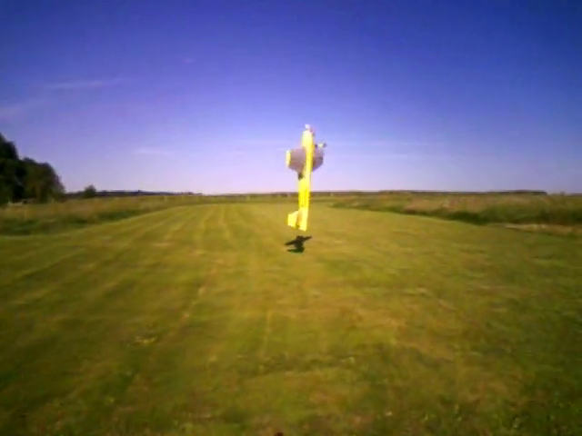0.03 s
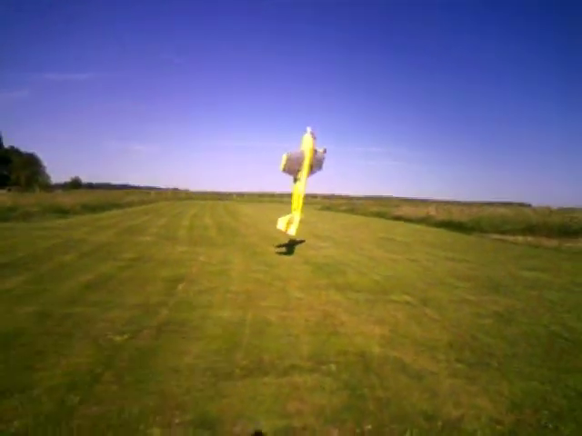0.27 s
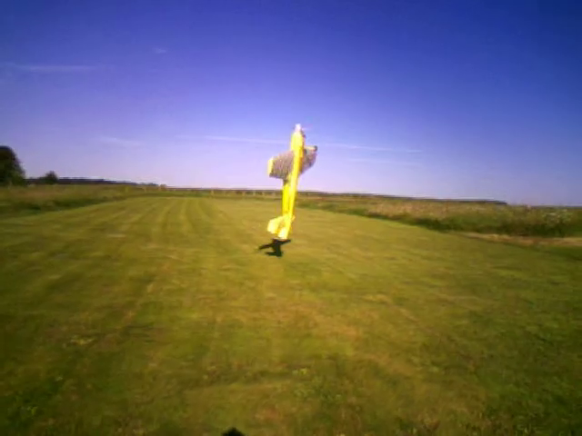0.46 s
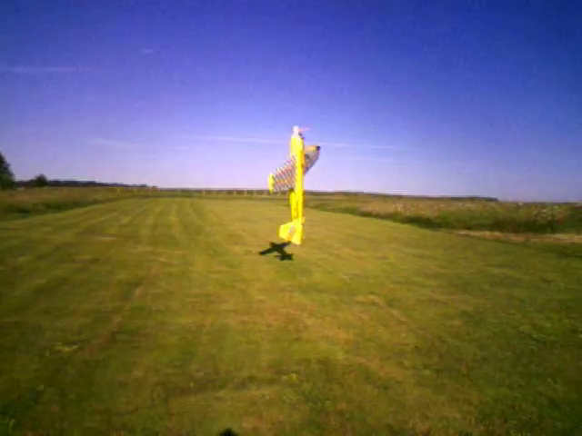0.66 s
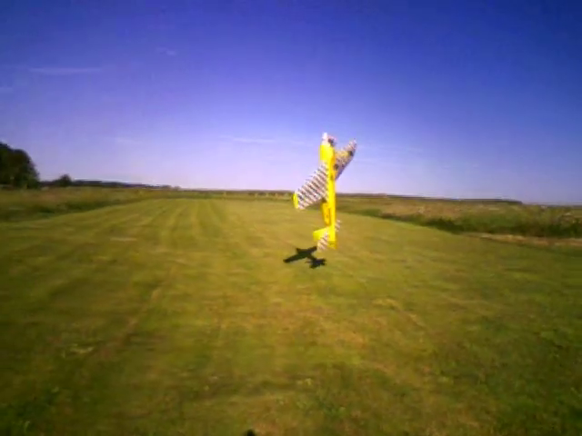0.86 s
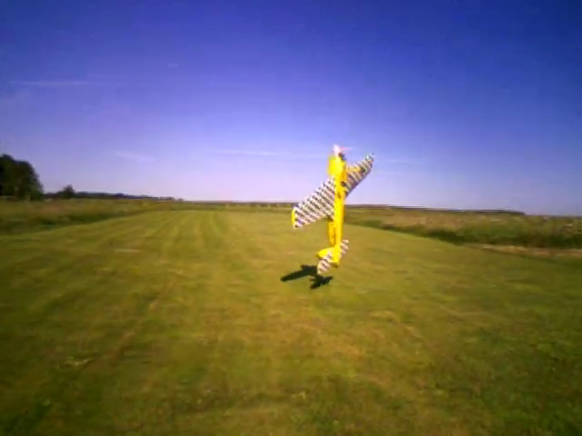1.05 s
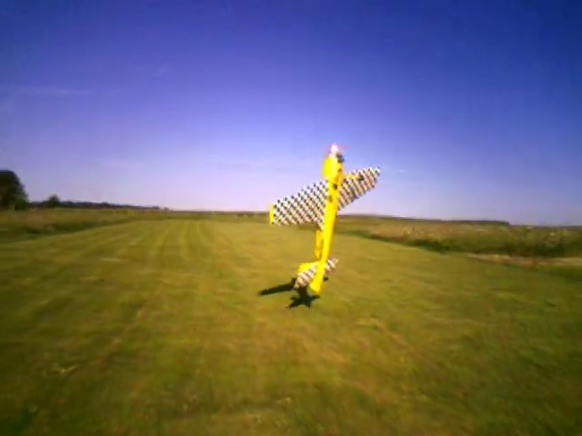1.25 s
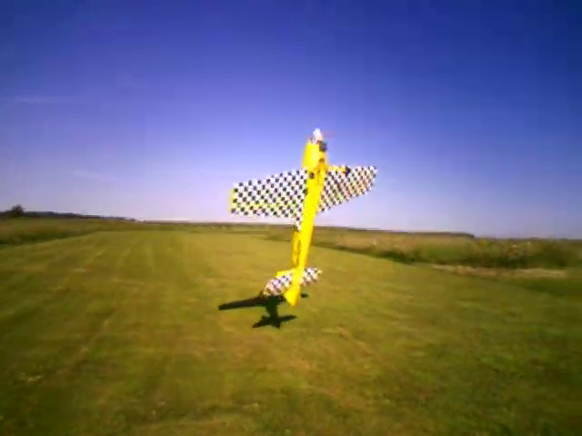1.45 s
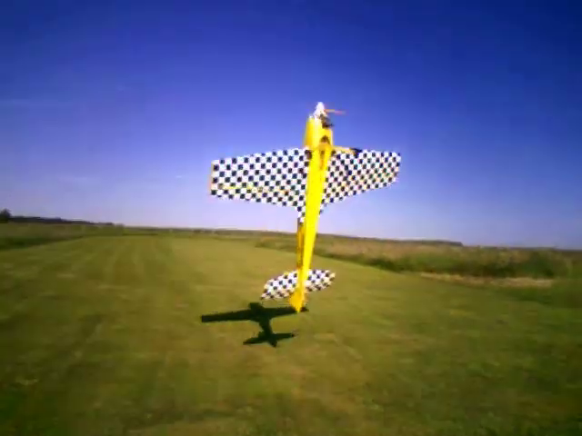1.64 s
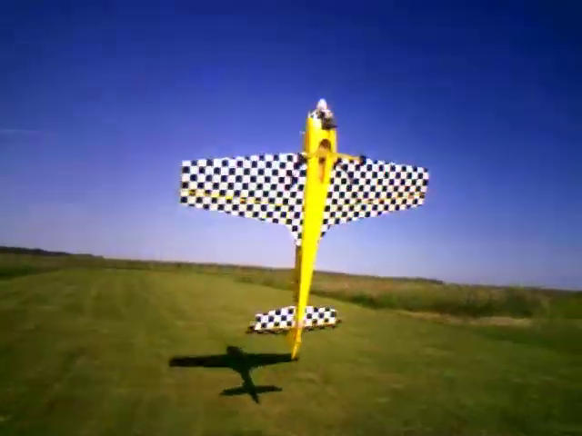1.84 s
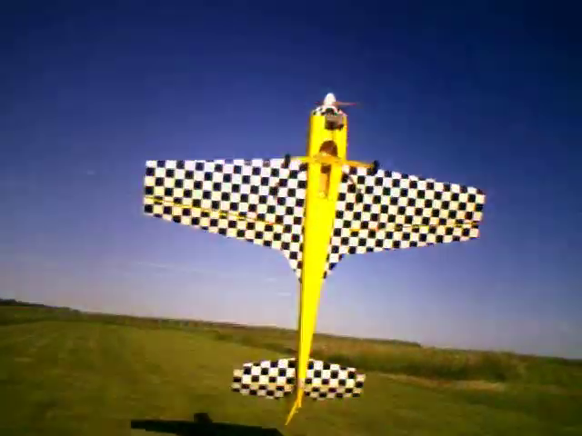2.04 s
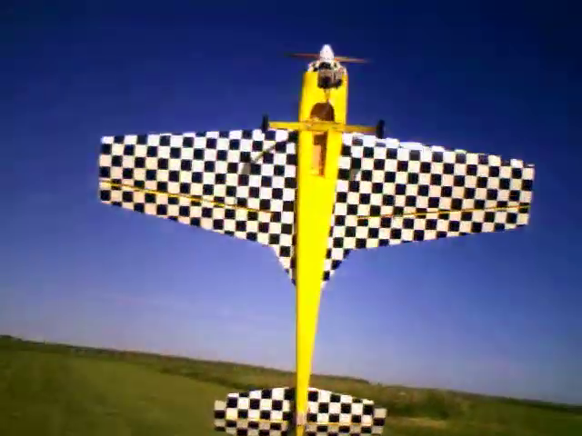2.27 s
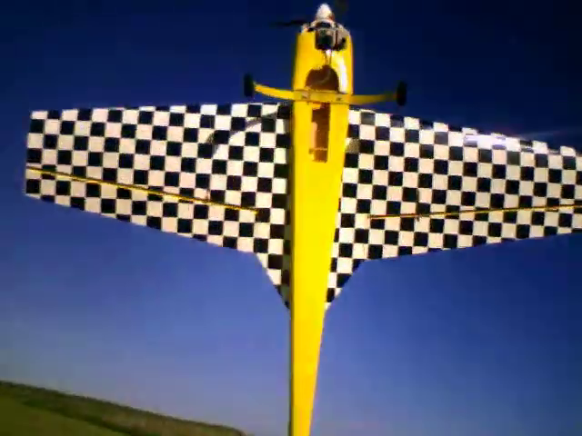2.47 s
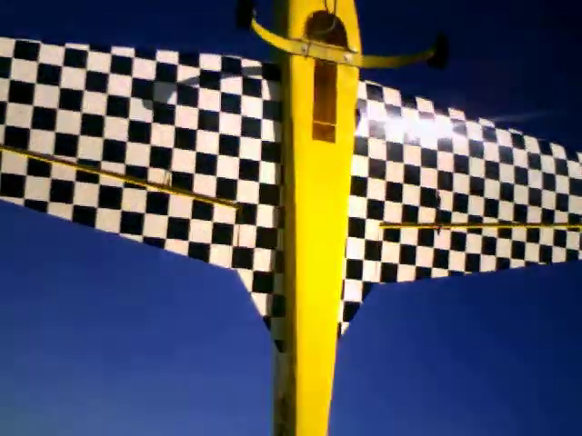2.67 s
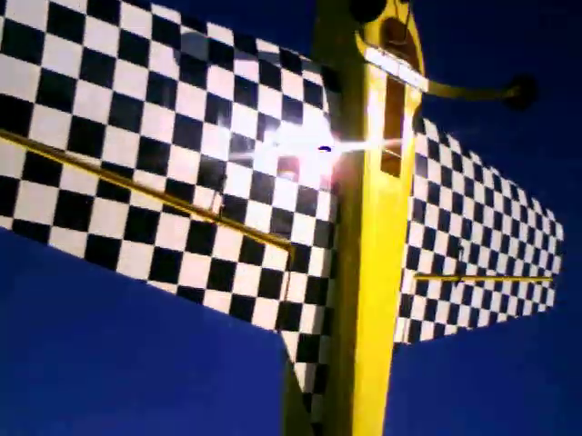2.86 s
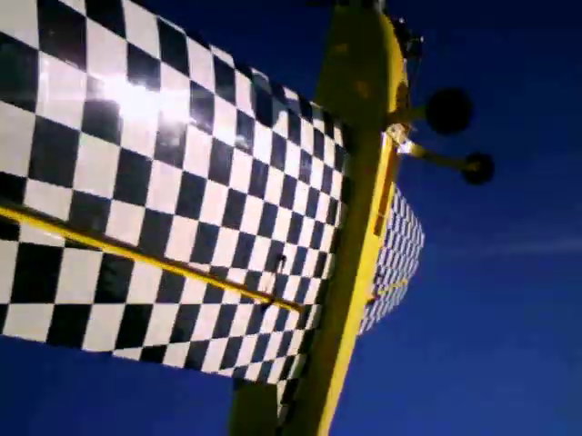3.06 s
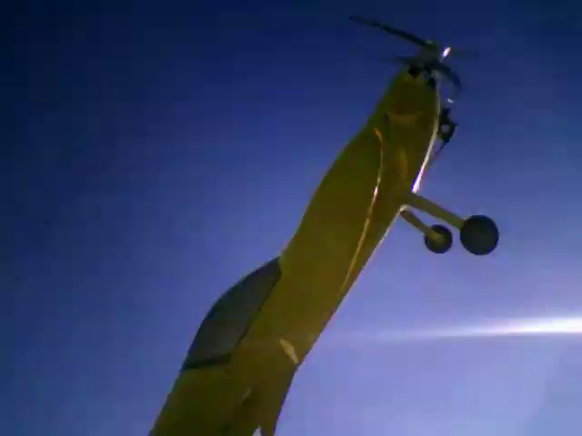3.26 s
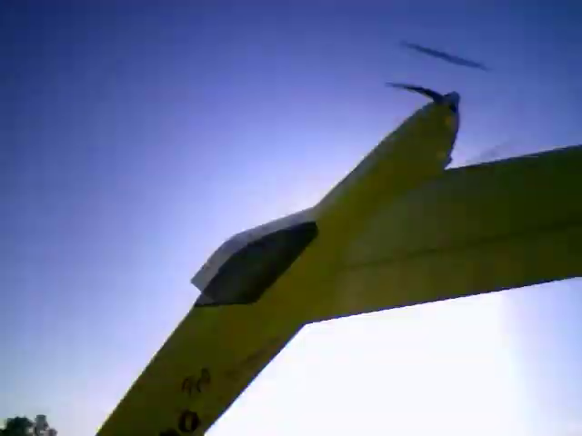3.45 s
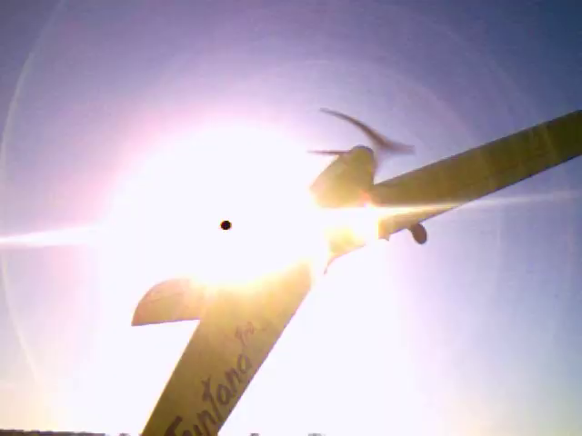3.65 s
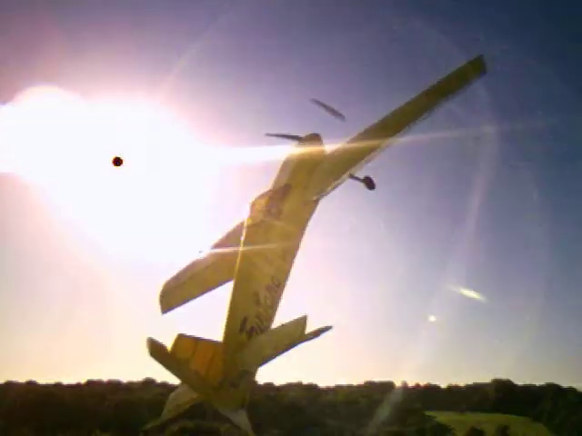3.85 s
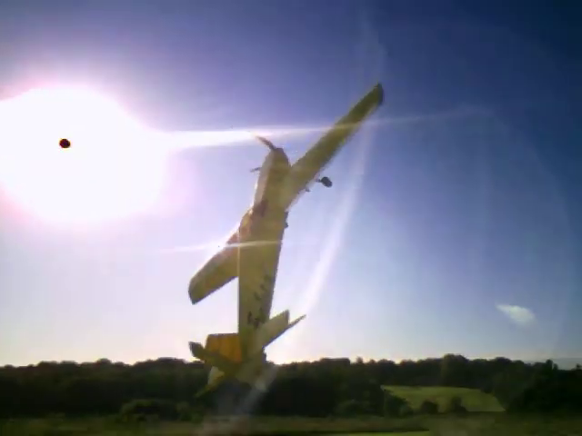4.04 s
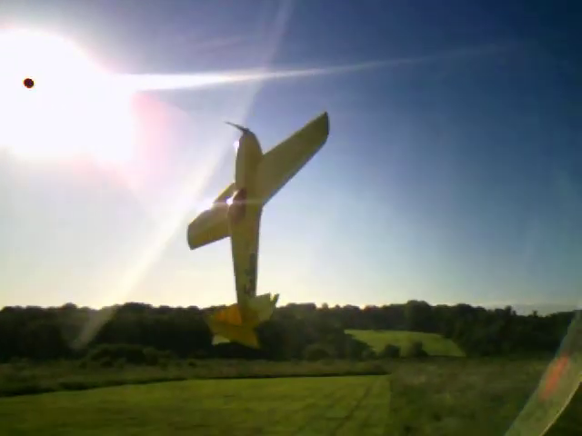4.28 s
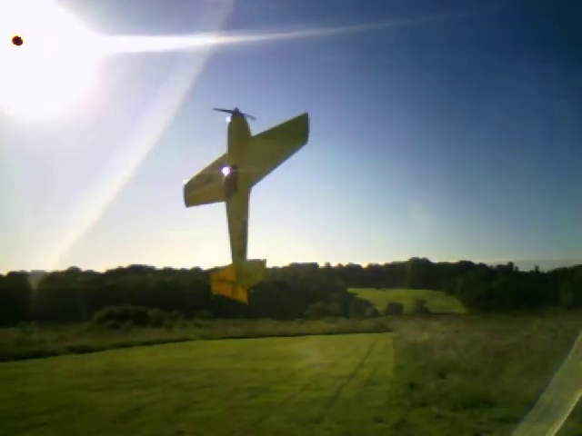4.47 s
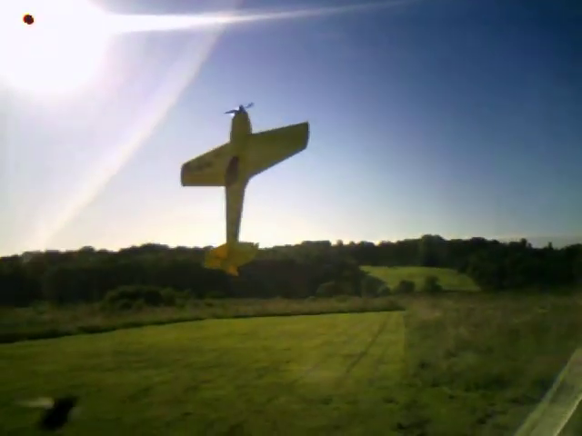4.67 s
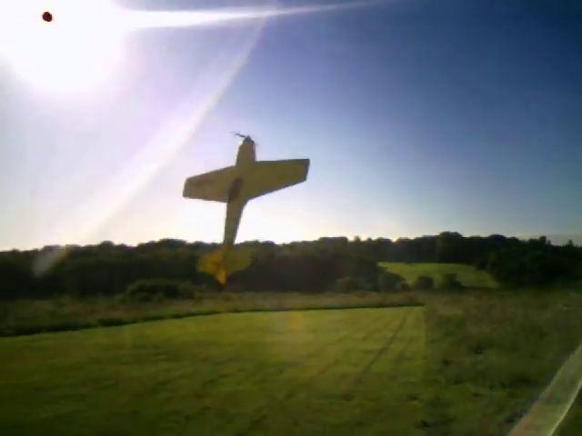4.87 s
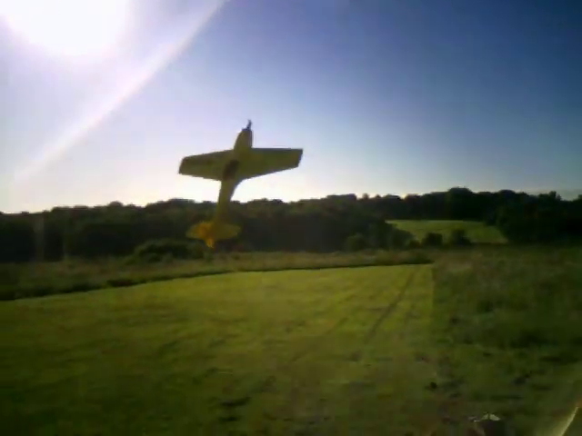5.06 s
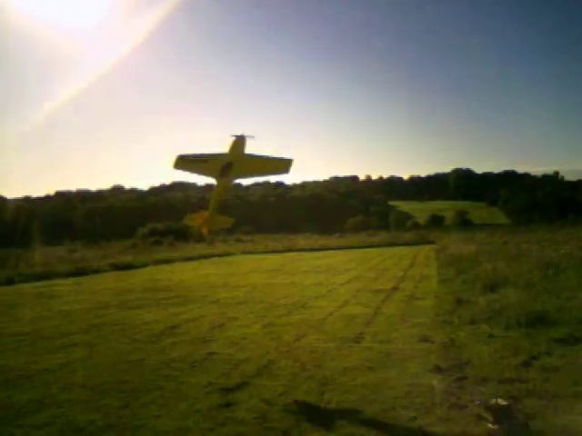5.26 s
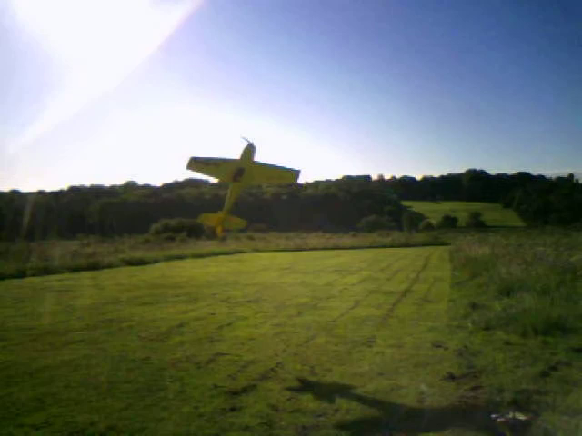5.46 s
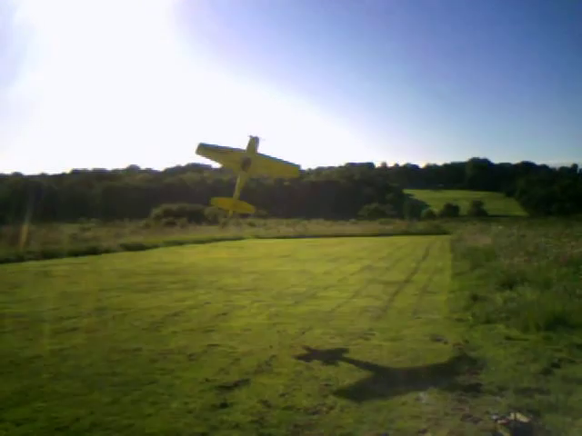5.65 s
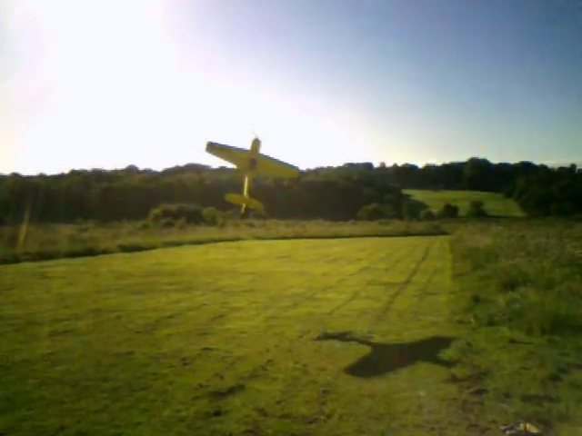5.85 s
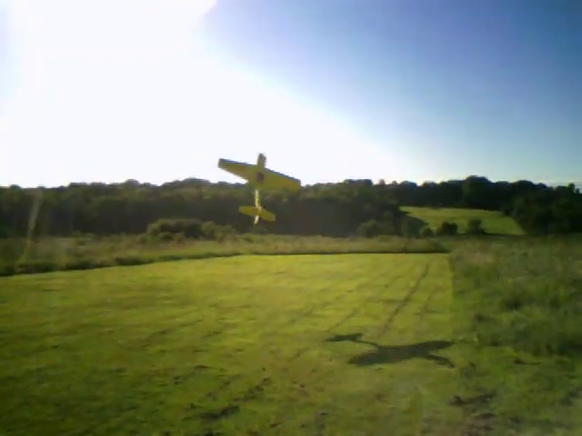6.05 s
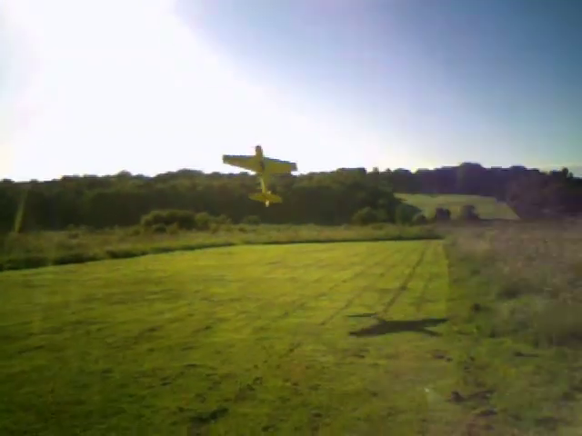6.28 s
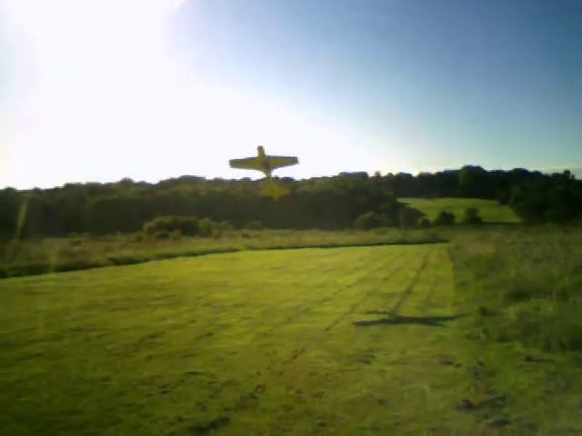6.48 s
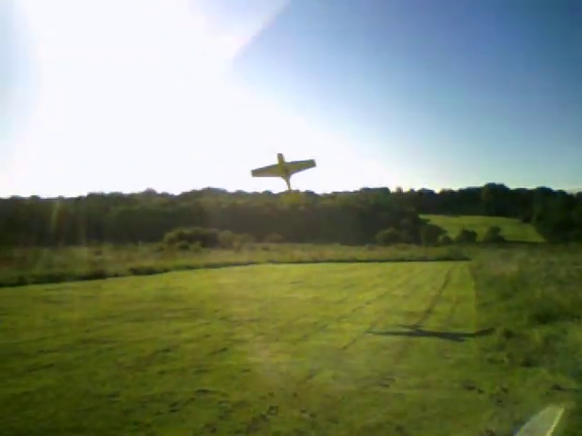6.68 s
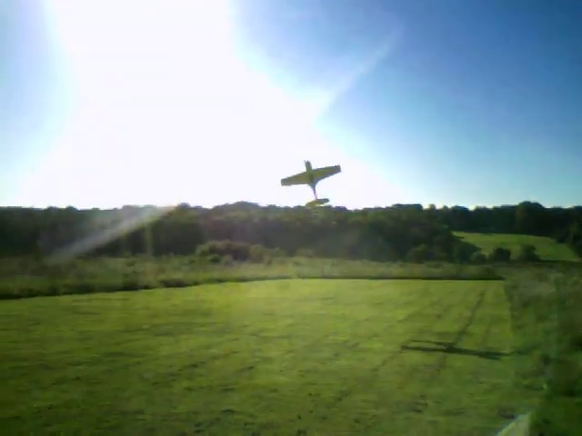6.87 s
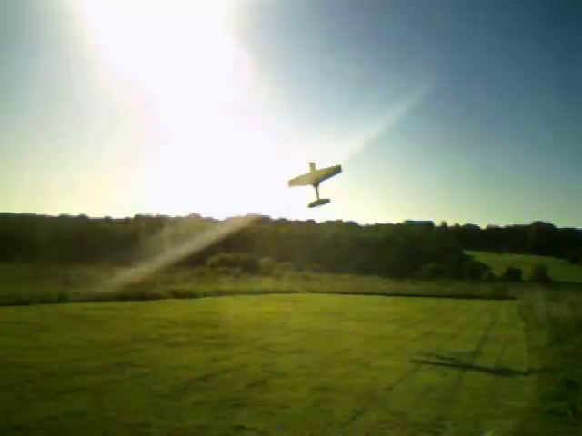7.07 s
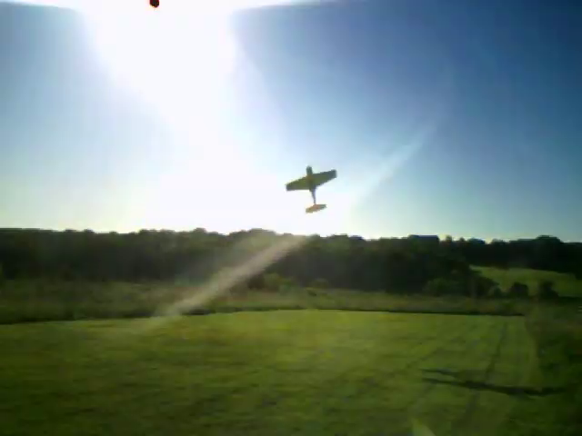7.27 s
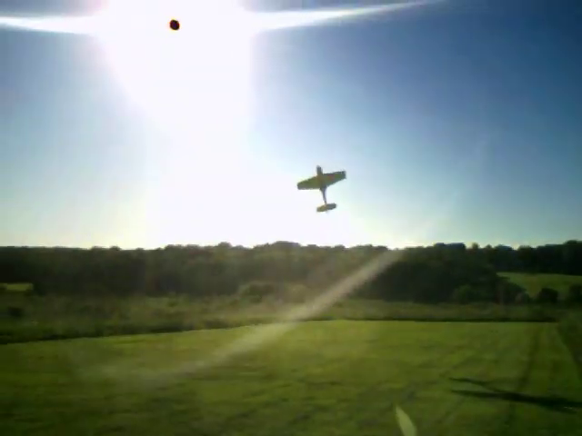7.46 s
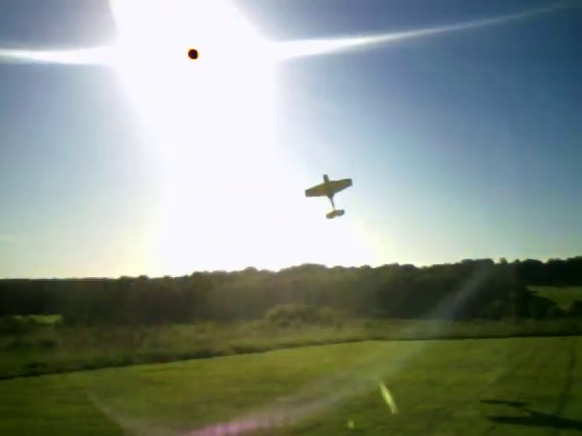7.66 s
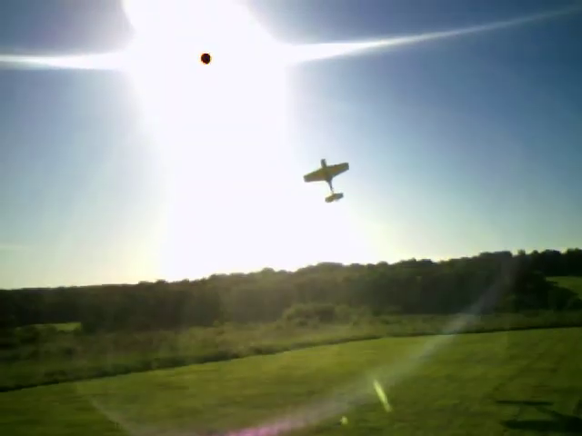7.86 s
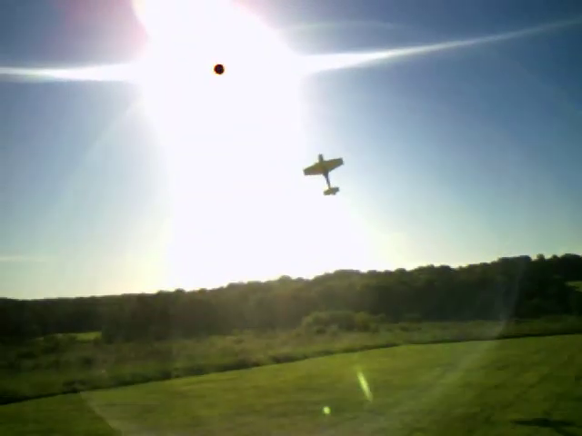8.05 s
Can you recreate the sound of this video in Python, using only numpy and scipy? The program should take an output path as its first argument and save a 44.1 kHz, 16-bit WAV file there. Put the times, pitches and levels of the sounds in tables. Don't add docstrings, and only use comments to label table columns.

```python
import sys
import numpy as np
from scipy import signal
from scipy.fft import rfft, irfft, next_fast_len
from scipy.io import wavfile
from scipy.ndimage import uniform_filter1d

SR = 44100
rng = np.random.default_rng(int(sys.argv[2]) if len(sys.argv) > 2 else 0)


def generate_wav(sig):
    pcm = np.round(np.clip(np.atleast_2d(sig).T, -1, 1) * 32767).astype(np.int16)
    wavfile.write(sys.argv[1], SR, pcm)


def invert_db(level):
    return 10 ** (np.asarray(level, dtype=float) / 20)


N = 358091


def level(x, db):
    return x * invert_db(db) / np.sqrt(np.mean(x ** 2))


def curves(table):
    s, *columns = np.transpose(table)
    return [np.interp(np.arange(N) / SR, s, c) for c in columns]


def walk(rate_hz):
    place = np.arange(N) * (rate_hz / SR)
    k = place.astype(int)
    part = place - k
    knots = 1.15 * rng.standard_normal(k[-1] + 2)
    smooth_step = part * part * (3 - 2 * part)
    return knots[k] + np.diff(knots)[k] * smooth_step


def coloured(points):
    hz, db = np.transpose(points)
    size = next_fast_len(N)
    log_hz = np.log(np.arange(size // 2 + 1) * SR / size + 1)
    gain = invert_db(np.interp(log_hz, np.log(hz), db))
    return level(irfft(rfft(rng.standard_normal(size)) * gain, size)[:N], 0)


# t/s, f/Hz
THROTTLE = [(0.0, 94.55), (0.471, 100.3), (0.496, 83.1), (1.154, 120.3), (1.703, 72.62), (2.012, 99.5),
            (2.331, 81.63), (3.396, 104.3), (3.424, 122.8), (3.826, 85.17), (4.406, 95.8), (4.623, 57.93),
            (5.361, 110.9), (5.787, 83.78), (6.198, 97.55), (6.9, 97.05), (7.393, 104), (8.12, 95.7)]


def shaft_hz():
    inertia_s = .119
    hz = curves(THROTTLE)[0]
    for _ in range(3):
        hz = uniform_filter1d(hz, size=int(2 * inertia_s * SR), mode="nearest")
    return hz


# t/s, disturbed inflow (1 = usual), phase spread/rad from wing echoes
INFLOW = [(0, .3, .7), (1.3, .55, .6), (2.3, .6, .9), (3.5, .8, .9), (4.3, .9, .6), (4.45, 3.2, .5),
          (4.85, 3.0, .5), (5.05, 1.1, .5), (5.45, .9, .5), (5.55, .9, 1.3), (5.72, .8, 1.3), (5.8, .7, .5),
          (6.05, .7, .5), (6.2, .35, 1.2), (8.12, .3, 1.2)]
# t/s, lag/ms
GRASS_LAG = [(-0.02, 6.64), (0.67, 6.5), (0.76, 7.3), (1.18, 6.02), (1.66, 8.25), (1.83, 7.86),
             (2.38, 9.68), (2.97, 9.6), (3.41, 7.34), (3.55, 7.55), (4.43, 4.92), (5.06, 3.37),
             (5.49, 3.764), (5.73, 2.36), (6.62, 1.85), (6.71, 0.68), (7.42, 0.56), (8.1, 0.59)]


def air_around(hz):
    return curves(INFLOW) + [hz] + curves(GRASS_LAG)


# t/s, order, length/s,
# level/dB
ROLL_LOBES = [(0.277, 15, 0.46, 10.5), (0.402, 3, 0.9, -5.5), (0.485, 2, 0.58, -5.5), (0.92, 4, 0.7, -4.5),
              (1.565, 6, 0.34, -7.5), (1.633, 4, 0.61, -5), (1.928, 3, 0.37, -3), (1.994, 2, 0.21, 10),
              (1.994, 5, 0.78, -8.5), (2.468, 4, 0.27, -18), (2.925, 13, 0.22, 12.0), (3.116, 6, 0.2, -11),
              (3.372, 2, 0.52, 11), (3.7, 3, 0.32, -7), (3.83, 7, 0.13, 10), (4.151, 4, 0.7, -13.5),
              (4.271, 8, 0.11, -9), (4.711, 6, 0.24, -9), (4.868, 4, 0.12, -15.5), (5.31, 8, 0.93, -6),
              (5.343, 5, 0.24, -16), (5.439, 2, 0.2, 8), (5.882, 3, 1, -4), (6.575, 10, 0.46, 7),
              (6.787, 7, 0.45, -15), (6.974, 6, 0.6, -19.5), (7.26, 9, 0.33, 9), (7.584, 5, 0.7, -7),
              (7.692, 14, 0.3, 10), (7.805, 7, 0.2, 11.5),
              (.3, 1, 0.44, -6), (1.15, 1, 0.44, 4), (1.479, 13, .3, 5.5), (2.073, 8, 0.13, 8),
               (2.122, 10, .2, -9.5), (2.592, 2, .45, 5.5), (2.752, 4, 0.26, 6), (2.786, 8, .3, 5.5),
               (2.871, 7, 0.49, 6), (2.908, 13, .3, -3), (2.987, 12, 0.22, 8), (3.072, 6, 0.73, 4),
               (3.15, 3, 0.18, 6), (4.701, 7, 0.28, -4), (4.705, 12, 0.77, -7.5), (4.749, 3, 0.29, 5),
               (4.83, 5, .3, -7), (5.05, 2, .2, -4), (5.27, 4, .2, -10), (5.63, 6, .45, -4),
               (5.833, 11, .5, 6), (5.9, 2, .4, -8), (6.513, 3, 0.22, 8), (6.587, 10, .2, 2.5),
               (7.1, 12, 0.56, 3), (7.141, 3, 0.25, 4.5), (7.22, 13, .7, 5), (7.298, 8, 0.16, 7),
               (7.58, 4, 0.25, 6.5), (7.62, 11, 0.63, 4)]


def lobes_db(order):
    t = np.arange(N) / SR
    return sum(db * np.exp(-2 * ((t - s) / length) ** 2)
               for s, k, length, db in ROLL_LOBES if round(k) == order)


def tone(turns, air, order, db, flutter_db):
    echo_share, grass_hz = 0.54, 415
    rough, spread, hz, lag_ms = air
    smear = (.12 + .04 * order) * walk(30)
    phase = 2 * np.pi * order * turns + spread * walk(1.5) + rough * smear
    echo = echo_share / np.hypot(1, order * hz / grass_hz)
    late = 2 * np.pi * order * hz * lag_ms / 1000
    loudness = np.sqrt(2) * invert_db(db + lobes_db(order) + flutter_db * walk(18))
    return -loudness * (np.cos(phase) + echo * np.cos(phase - late))


# order, level/dB
BLADE_ORDERS = [(2, -14.5), (4, -7), (6, -10), (8, -9.5)]
# order, level/dB
FRAME_ORDERS = [(1, -20.5), (3, -9.5), (5, -8), (7, -12.5)]


def low_tones(turns, air, tones_db):
    blades = sum(tone(turns, air, round(k), db, flutter_db=1.5) for k, db in BLADE_ORDERS)
    frame = sum(tone(turns, air, round(k), db, flutter_db=1.4) for k, db in FRAME_ORDERS)
    return invert_db(tones_db) * (blades + frame)


# order, level/dB
MOTOR_ORDERS = [(9, -13.5), (10, -13.5), (11, -16), (12, -15.5), (13, -17), (14, -17), (15, -19)]
# order, level/dB
UPPER_ORDERS = [(16, -8), (17, -11), (18, -11.5), (19, -13), (20, -17.5), (21, -21), (22, -12.5)]


def whine(turns, air, tones_db, upper_db):
    swell_db = 3.
    strong = sum(tone(turns, air, round(k), db, flutter_db=2.24) for k, db in MOTOR_ORDERS)
    weak = sum(tone(turns, air, round(k), db + swell_db * walk(4), flutter_db=2.5) for k, db in UPPER_ORDERS)
    return invert_db(tones_db) * strong + invert_db(upper_db) * level(weak, -8.5)


# f/Hz, level/dB per Hz
TIP_RUSH = [(40, -21.5), (150, -18), (300, -4.5), (1000, 1), (2000, -4), (3000, -15.5), (4500, -16.5),
            (8000, -48)]
# f/Hz, level/dB per Hz
WAKE_RASP = [(300, -26), (1000, -3), (2000, -3), (3500, -8), (5000, -5), (9000, -25.5)]


def rush(turns, rush_db, rasp_db):
    swirl = invert_db(1.8 * walk(9) + 0.69 * walk(40)) * level(coloured(TIP_RUSH), 2.22)
    shifted = turns + .15
    scatter_db = 1.5
    strength = invert_db(scatter_db * rng.standard_normal(N // 100))[shifted.astype(int)]
    gate = strength * np.exp(-(shifted % 1) / 0.2)
    rasp = level(gate * coloured(WAKE_RASP), -4.0)
    return invert_db(rush_db) * (swirl + invert_db(rasp_db) * rasp)


# t/s, level/dB
GUST_SWELL = [
    (7.6, -47),
    (7.67, -34.5),
    (7.788, -26),
    (7.91, -34),
    (7.962, -28),
    (8.0, -31),
    (8.12, -27),
]
# f/Hz, level/dB per Hz
BREEZE = [(15, -3.5), (60, -5), (150, -11.5), (500, -24), (3000, -35)]


def gust():
    thump = coloured([(15, -9), (60, -1.0), (250, -3.5), (450, -7), (1000, -40.5)])
    s, db = np.transpose(GUST_SWELL)
    swell_db = np.interp(np.arange(N) / SR, s, db, left=-90)
    flutter_db = 2.5
    thumps = invert_db(swell_db + flutter_db * walk(30) + 6.0) * thump
    breeze = invert_db(-39.5 + 1.7 * walk(2.8)) * coloured(BREEZE)
    return thumps + breeze


# t/s, level/dB, air rush under it/dB, closeness/dB
FLIGHT = [(0, -12.5, -12.5, -0.5), (.57, -12.5, -11.5, 0), (1.15, -6, -16, -0.5), (1.49, -12.5, -12.5, 3),
          (1.99, -7.5, -13.5, 1), (2.3, -8.5, -14.5, 3), (2.7, -4.5, -11, 0), (3.62, -5, -10.5, 2.5),
          (3.75, -9.5, -12.5, 1.5), (4.3, -9.5, -12, 0.5), (4.56, -12.5, -14.5, 1.5), (5.1, -11.5, -11, 2),
          (5.4, -12, -12, -1.5), (5.61, -15.5, -7, 0.5), (6.1, -14.5, -10.5, 2.5),
          (6.24, -16.5, -6.5, -0.5), (6.69, -17.5, -8.5, 0), (8.12, -19.5, -9.5, -1)]


def scene():
    hz = shaft_hz()
    turns = np.cumsum(hz * (1 + 0.002993 * walk(22))) / SR
    loud_db, rush_db, close_db = curves(FLIGHT)
    facing_db, away_db, pass_s, pass_length_s = 5, -4.5, 3.5, 0.44
    passed = np.clip((np.arange(N) / SR - pass_s) / pass_length_s + .5, 0, 1)
    rasp_db = facing_db + (away_db - facing_db) * passed
    drive_db = close_db + 1.266 * np.maximum(loud_db + 15.5, 0)
    air = air_around(hz)
    tones_db, upper_db = loud_db - 1.5, loud_db - 7
    plane = low_tones(turns, air, tones_db)
    plane = plane + whine(turns, air, tones_db, upper_db)
    plane = plane + rush(turns, loud_db + rush_db, rasp_db)
    return (invert_db(drive_db) * plane + gust())[None]


def low_pass(x):
    return signal.sosfilt(signal.butter(12, 15740, fs=SR, output="sos"), x)


def record(dry):
    bias_knee, bias_sag, bias_s = 1.5, .6, .06
    swing = uniform_filter1d(np.abs(dry[0]), size=int(bias_s * SR))
    biased = dry[0] - bias_sag * np.maximum(swing - bias_knee, 0)
    rail_top, rail_bottom, rail_soft = 0.39, -0.84, 0.12
    railed = rail_top - rail_soft * np.logaddexp(0, (rail_top - biased) / rail_soft)
    railed = np.maximum(railed, rail_bottom)
    capacitor = signal.butter(1, 3.8, "high", fs=SR, output="sos")
    coupled = signal.sosfilt(capacitor, railed - railed[:2000].mean())
    smooth = signal.sosfilt(signal.butter(1, 5000., fs=SR, output="sos"), coupled)
    camera_sr, offset, full_scale = 8000, -0.12, 0.71
    sample_places = np.arange(N * camera_sr // SR + 2) * SR / camera_sr
    samples = np.interp(sample_places, np.arange(N), smooth)
    samples = np.clip(samples + offset, -full_scale, full_scale)
    taps, fine_sr = 32 * 441 + 1, 441 * camera_sr
    sinc = signal.firwin(taps, 4050., window=("kaiser", 9.), fs=fine_sr)
    full = signal.resample_poly(samples, 441, 80, window=sinc, padtype="mean")[:N]
    return low_pass(np.clip(full, -full_scale, full_scale)[None])


dry = scene()
out = record(dry)
generate_wav(out)
```